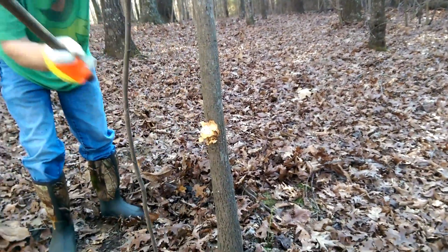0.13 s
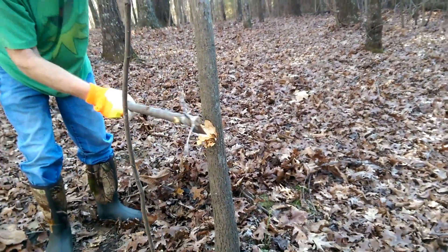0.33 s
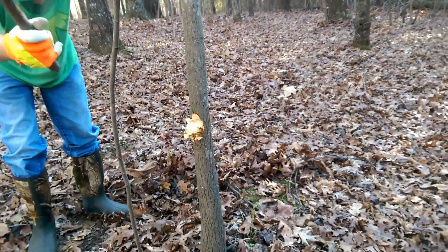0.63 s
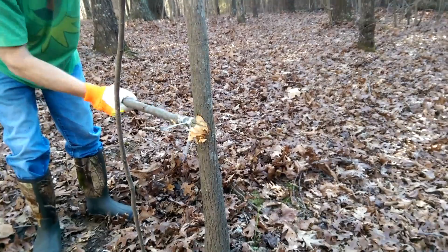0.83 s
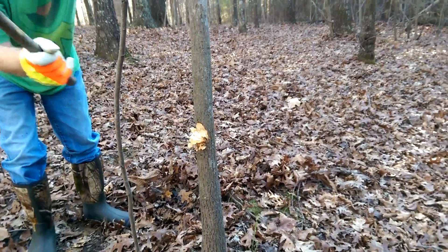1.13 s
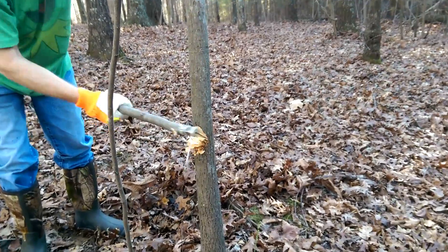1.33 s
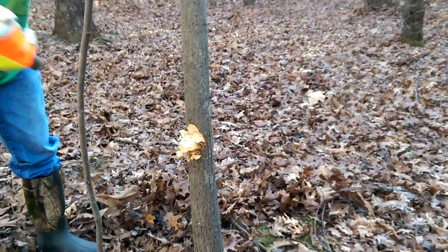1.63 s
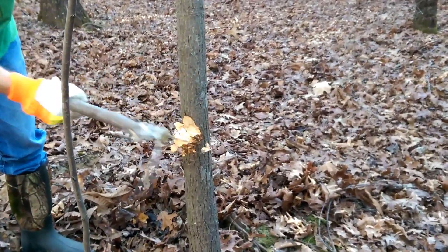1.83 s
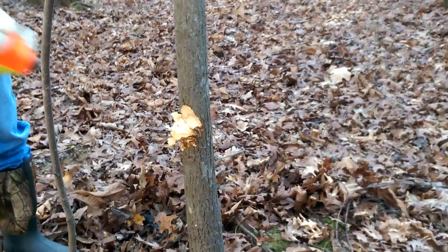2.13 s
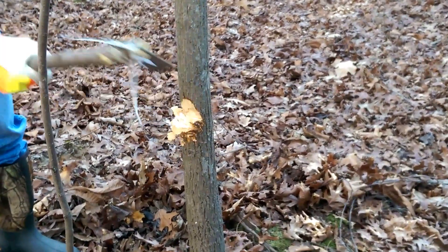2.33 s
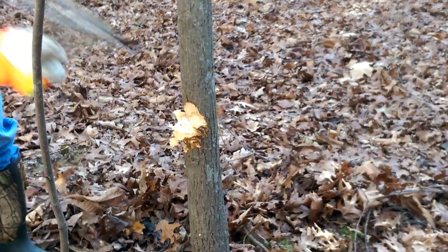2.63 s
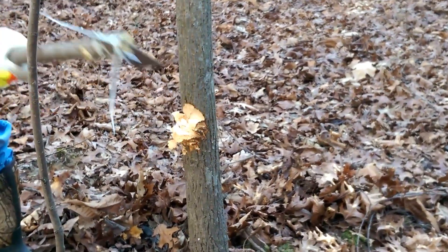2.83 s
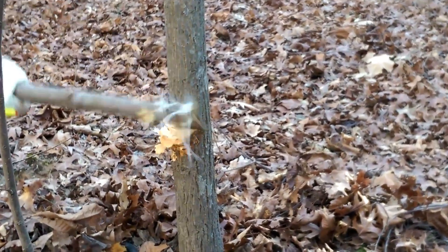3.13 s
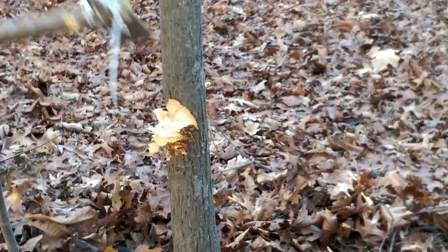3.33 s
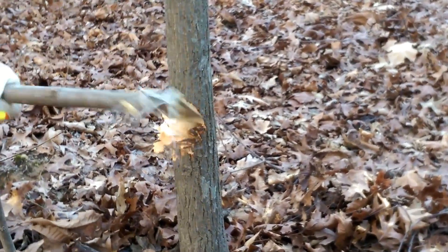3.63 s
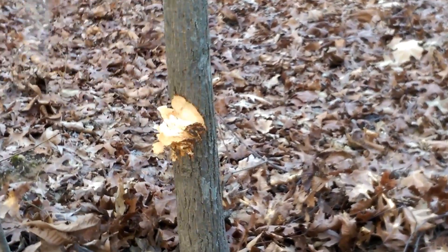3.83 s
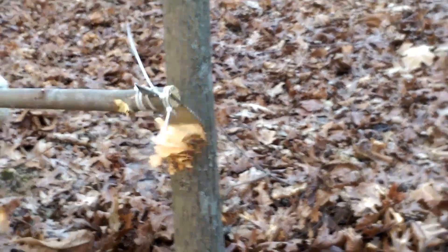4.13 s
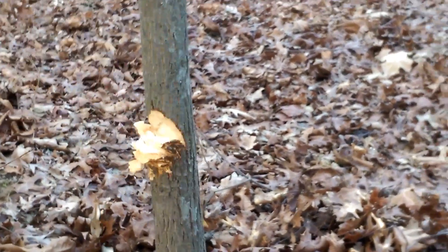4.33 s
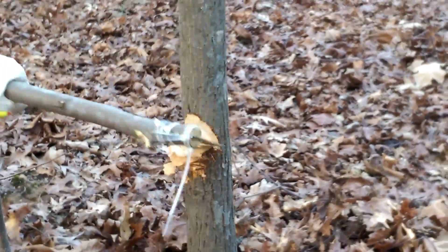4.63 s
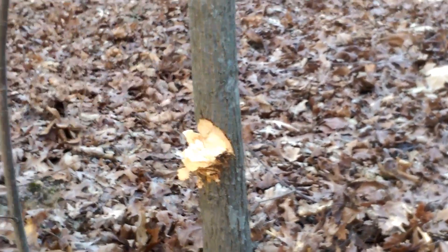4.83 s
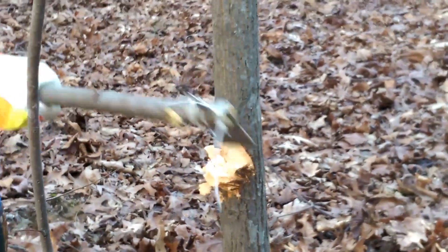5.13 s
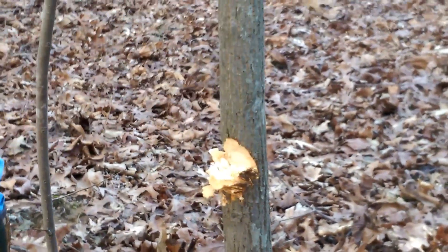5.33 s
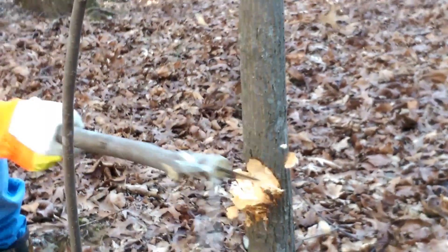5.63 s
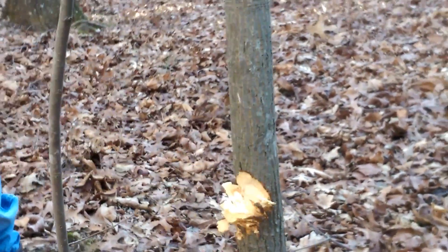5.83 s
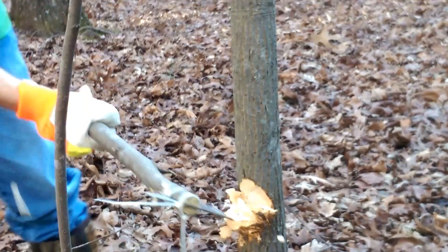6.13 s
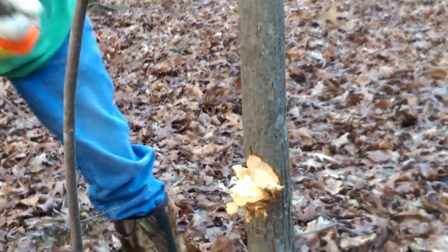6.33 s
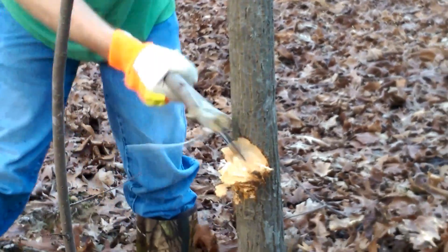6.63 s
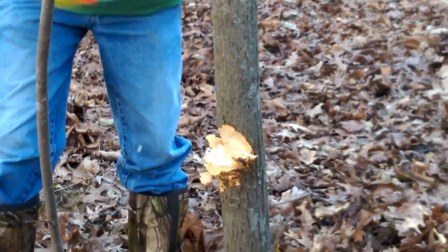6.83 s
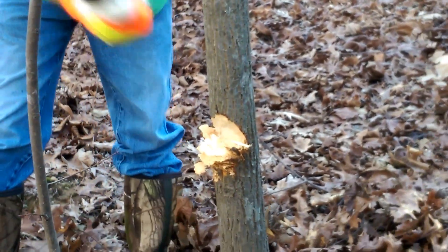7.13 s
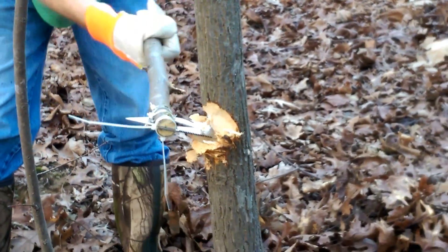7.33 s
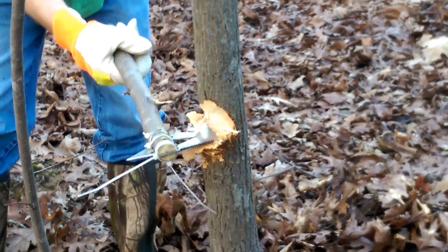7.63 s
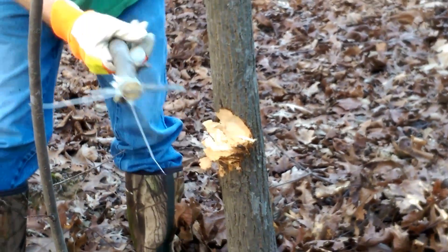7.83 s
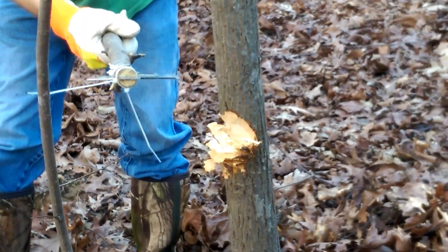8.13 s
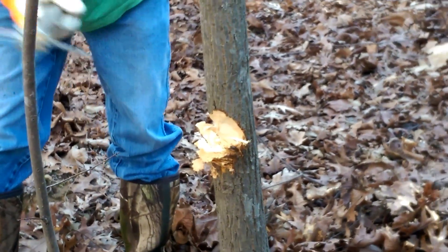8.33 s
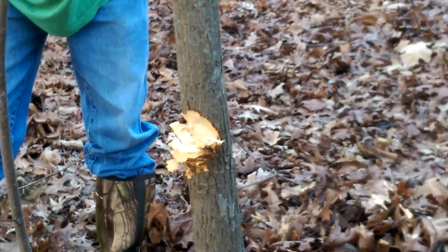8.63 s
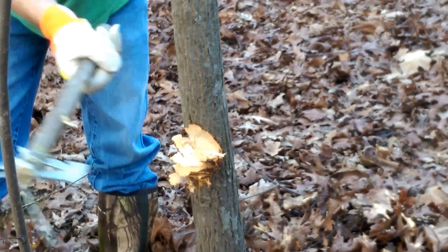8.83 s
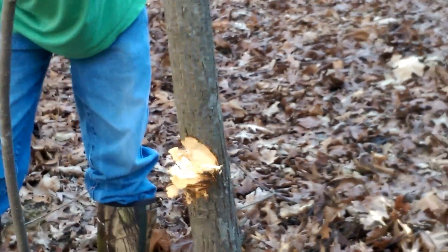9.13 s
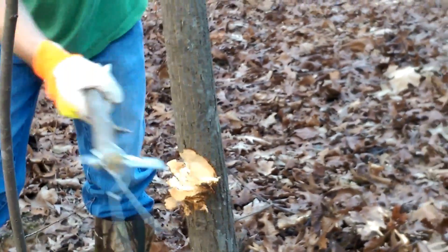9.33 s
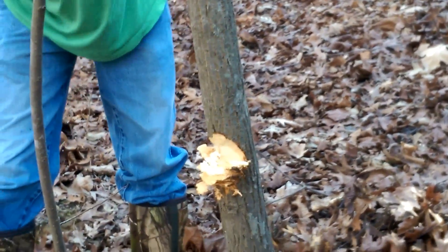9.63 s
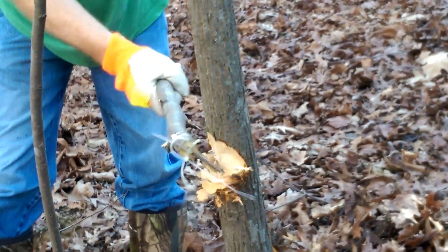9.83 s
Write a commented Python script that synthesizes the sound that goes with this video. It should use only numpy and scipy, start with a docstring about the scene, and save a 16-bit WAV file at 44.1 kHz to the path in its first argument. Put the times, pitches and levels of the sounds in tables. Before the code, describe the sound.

Close stereo pickup in quiet leafy woods: a small axe strikes a thin trunk about every half second, each blow a short bright crack with a woody knock and faint echo. Chips tick into dry leaves. After six seconds boots shuffle loudly through the litter, a few less regular blows follow, then a gap with a tap on the microphone case, and three last chops.

```python
"""A small axe bites again and again into a thin standing tree in leaf-covered woods.
Each blow is a burst of tearing-fibre clicks over ringing trunk and blade modes, with a tail among the trunks.
Debris showers and chips patter into dry leaves as enveloped grains; boots shuffle the litter.
The handle and boots knock as puffs of noise, one chip whirrs, the case is tapped, a low hum lies far below.
Two close microphone ports hear it: the right lags, nearly opposed in the bass and mostly softer."""
import sys
import numpy as np
from scipy import signal
from scipy.fft import irfft
from scipy.io import wavfile

SR = 44100
rng = np.random.default_rng(int(sys.argv[2]) if len(sys.argv) > 2 else 0)


def unload_audio(sound):
    """Save the sound as a 16-bit wav file, at the path given as the first command line argument."""
    columns = np.transpose(np.atleast_2d(sound))
    # keep every value between -1 and 1, then stretch to whole-number steps
    steps = np.round(np.clip(columns, -1, 1) * 32767)
    wavfile.write(sys.argv[1], SR, steps.astype(np.int16))


N = 440543

# axe blows: [t/s, level/dB, t60/s, second bite after/s, second bite re first/dB,
#             bass/dB, low-mid/dB, treble/dB, debris shower/dB]
BLOWS = [(0.3128, -5, 0.019, 0.0067, -5, 4.5, 1.5, 6.5, -44),
         (0.891, -9.5, 0.015, 0.0064, -12, 1, -2, 8, -51.5),
         (1.3642, -6.5, 0.025, 0.014, -33, 8.5, -3.5, 7, -51),
         (1.8319, -5.5, 0.0089, 0.0044, -5.5, 8, -0.5, 9, -49),
         (2.296, -6, 0.015, 0.0043, -22.5, 6.5, 0.5, 4.5, -42),
         (2.7496, -9.5, 0.012, 0.0035, -24, 10.5, 4.5, 12.5, -51.5),
         (3.2243, -11.5, 0.017, 0.002, -30, 3, 0, 12, -46),
         (3.7441, -6.5, 0.017, 0.0021, -8, 8, -1.5, 4.5, -47.5),
         (4.2146, -5, 0.021, 0.0034, -23.5, 10.5, 2, 7.5, -48),
         (4.669, -6, 0.019, 0.013, -43, 1.5, -3.5, 5, -45.5),
         (5.1447, -6, 0.027, 0.00081, -6.5, 5, -5.5, 6, -47.5),
         (5.616, -9, 0.018, 0.0035, -8, 7.5, -4, 10, -43),
         (6.119, -6, 0.015, 0.0037, -1, -1.5, -8, 3.5, -75),
         (6.7277, -9.5, 0.021, 0.0054, -0.5, 6, -5.5, 9.5, -71),
         (7.283, -14.5, 0.026, 0.0031, -5, 11.5, -1, 12.5, -54),
         (7.3448, -15.5, 0.023, 0.0014, -16, 3.5, -6.5, -2, -76),
         (8.8321, -7, 0.015, 0.0036, -22, 3, -9.5, 7.5, -44),
         (9.3537, -9.5, 0.027, 0.0049, -23, 5.5, -6, 11.5, -35),
         (9.912, -7.5, 0.032, 0.0088, -5, 6, -9, 8.5, -39)]
# centres of the bass, low-mid, core and treble regions: [f/Hz]
REGIONS_HZ = [450, 1250, 3300, 9500]
EDGES_HZ = 25 * 2 ** np.arange(0, 9.5, 1 / 3)   # third-octave band edges
BANDS_HZ = np.sqrt(EDGES_HZ[1:] * EDGES_HZ[:-1])


def from_db(db):
    """Decibels to amplitude."""
    return 10 ** (np.asarray(db) / 20)


def rms_one(x):
    """Scales a signal to an rms of 1."""
    return x / np.sqrt(np.mean(x ** 2) + 1e-20)


def in_time(rows):
    """Draws straight lines between the timed rows, one curve per column."""
    s, *columns = np.transpose(rows)
    return [np.interp(np.arange(N) / SR, s, c) for c in columns]


def at_hz(points, hz):
    """Reads a spectrum table at one frequency, along a logarithmic axis."""
    return np.interp(np.log(hz), np.log(np.array(points)[:, 0]), np.array(points)[:, 1])


def drift(rate):
    """Slow random curve of rms 1: noise at every 40th sample through a double one-pole low-pass."""
    r = np.exp(-80 * np.pi * rate / SR)
    noise = rng.standard_normal(N // 40 + 2002)
    slow = signal.lfilter([1], [1, -2 * r, r * r], noise)[2000:]   # skip the filter's run-in
    return np.interp(np.arange(N) / 40, np.arange(len(slow)), rms_one(slow))


def ring(clicks, hz, t60):
    """Resonator: a unit click sets a dying sine of height 1 ringing."""
    r, w = from_db(-60 / (t60 * SR)), 2 * np.pi * hz / SR
    return signal.lfilter([0, np.sin(w)], [1, -2 * r * np.cos(w), r * r], clicks + 1e-18)


def grains(per_s, spread_db):
    """Two unrelated trains of random clicks of uneven size and either sign; rms 1 together."""
    sizes = from_db(spread_db * np.minimum(rng.exponential(1, (2, N)), 4.0))
    signed = sizes * rng.choice([-1, 1], (2, N))
    return rms_one(signed * (rng.random((2, N)) < per_s / SR))


def add(track, s, level_db, t60, rise_s):
    """Lays a quickly rising, exponentially dying envelope on the track."""
    i = round(s * SR)
    length = max(min(round(1.5 * t60 * SR), track.shape[-1] - i), 0)
    t = np.arange(length) / SR
    shape = (1 - np.exp(-t / rise_s)) * from_db(-60 * t / t60)
    track[..., i:i + length] += from_db(level_db)[..., None] * shape


def blow_envelopes():
    """Envelopes of the four regions: the edge lands, then bites a second time as fibres give."""
    out = np.zeros((len(REGIONS_HZ), N))
    for s, db, t60, later, second_db, bass_db, mid_db, treble_db, _ in BLOWS:
        colour_db = db + np.array([bass_db, mid_db, 0, treble_db])
        add(out, s, colour_db, t60, rise_s=.00005)
        add(out, s + later, colour_db + second_db, t60, rise_s=0.00053)
        # splinters and the nearest reflections linger
        add(out, s, colour_db - 25.5, .12, rise_s=0.0044)
    return out


def trunk():
    """Both bites of a blow strike every mode; strength and pitch shift with where the edge lands in the cut."""
    # trunk and blade modes: [f/Hz, level/dB, t60/s]
    cut_modes = [(130, -37, 0.059), (226, -34.5, 0.032), (337, -26, 0.016), (1165, -12, 0.0054),
                 (2081, -19, 0.007), (3030, -5.5, .012)]
    out, t = np.zeros(N), np.arange(N) / SR
    for s, db, t60, later, second_db, bass_db, *colour in BLOWS:
        spots = rng.standard_normal((len(cut_modes), 2))
        for (hz, level_db, ring_s), (strength, place) in zip(cut_modes, spots):
            level_db += bass_db * (hz < 700)   # the blow's bass colours the low modes only
            i = round(s * SR)
            swell = np.zeros(min(SR // 8, N - i))
            add(swell, 0, db + level_db + 3.0 * strength, ring_s, rise_s=.0001)
            add(swell, later, db + second_db + level_db + 0.75 * strength, ring_s, rise_s=0.00046)
            pitch_hz = hz * (1 + 0.053 * place)
            out[i:i + len(swell)] += swell * np.sin(2 * np.pi * pitch_hz * t[:len(swell)])
    return out


def leaf_envelopes():
    """Each blow shakes down a shower of debris and chips land, on a bed of stirring litter."""
    # leaf litter stirring under the boots, one long shuffle after 6 s: [t/s, level/dB, treble/dB]
    rustle = [(0, -50, -4), (.75, -54, 1.5), (1.3, -58.5, 5.5), (1.75, -53, 0.5), (2.2, -58.5, 3.5),
              (3.6, -58, 3.5), (4.1, -59, 2.5), (4.19, -46.5, 5.5), (4.23, -59, 4.5), (5.0, -55.5, -4),
              (5.55, -61.5, 2.5), (5.95, -61.5, -5), (6.02, -41.5, -0.5), (6.28, -30.5, 0.5),
              (6.4, -33, 0.5), (6.5, -30, 1), (6.64, -42, -0.5), (6.84, -30, -.5), (7.11, -46.5, -1),
              (7.55, -57.5, -2), (8.5, -66.5, -7), (9.3, -60, -2.5), (9.99, -60, -4)]
    # chips and twigs landing in the leaves: [t/s, level/dB, t60/s, treble/dB]
    chips = [(0.111, -31.5, 0.027, 1.5), (0.3734, -39.5, 0.022, 24), (0.3836, -32, 0.065, 5),
             (0.451, -24, 0.13, 1.5), (0.5343, -42, 0.01, 16), (0.748, -41.5, 0.05, 5),
             (0.9436, -27, 0.014, 2), (1.085, -38.5, 0.014, 17.5), (1.433, -42.5, 0.014, 18),
             (1.5152, -33.5, 0.011, 20.5), (1.5257, -21.5, 0.036, 3), (1.544, -26, 0.0054, 19),
             (1.595, -22.5, 0.0065, 4.5), (1.7036, -34, 0.016, -7), (1.751, -30.5, 0.033, -1.5),
             (2.0195, -24.5, 0.015, 3.5), (2.0546, -35, 0.013, 6), (2.146, -27.5, 0.011, -13),
             (2.2512, -42.5, 0.011, 17), (2.348, -15, 0.0091, 4), (2.5746, -46.5, 0.089, 8),
             (2.7025, -20, 0.0063, 1), (2.837, -45, 0.0082, 18), (2.8948, -39, 0.0027, 33),
             (2.9374, -37, 0.025, 0), (3.275, -39, 0.012, 16), (3.3264, -38, 0.014, 20.5),
             (3.4842, -34.5, 0.014, 12.5), (3.5357, -30.5, 0.022, 0.5), (3.609, -21.5, 0.0053, 7.5),
             (3.6795, -32.5, 0.035, -1), (3.8915, -31.5, 0.011, 9.5), (3.9507, -41.5, 0.0066, 18.5),
             (4.2803, -40, 0.019, 18.5), (4.3273, -27, 0.0035, 16), (4.3454, -19.5, 0.0063, 16.5),
             (4.575, -31, 0.0096, 7), (4.645, -28, 0.022, -11), (4.7195, -12.5, 0.019, -21),
             (4.803, -36.5, 0.0095, 15), (5.1145, -21.5, 0.006, 3), (5.263, -33, 0.098, 4.5),
             (5.483, -23, 0.015, -5), (5.503, -35, 0.023, -1), (5.5432, -35, 0.019, 6.5),
             (5.7097, -35, 0.011, 10.5), (5.945, -25, 0.015, 1.5), (6.004, -35, 0.078, 11.5),
             (6.789, -24.5, 0.05, 3.5), (6.8067, -24, 0.025, 5), (7.17, -41, 0.07, 2),
             (7.497, -35.5, 0.017, 3.5), (7.7843, -34, 0.0095, 1), (9.3034, -36, 0.018, 4),
             (9.4405, -22, 0.012, 0), (9.462, -20.5, 0.063, -3.5), (9.664, -30, 0.031, -1.5),
             (9.755, -40, 0.021, 1)]
    shower_delay_s, shower_rise_s, shower_t60_s, shower_treble_db = .015, .025, 0.69, -1.5
    crumbs_per_s, crumb_t60_s, crumb_treble_db = 36, 0.0081, 7.5
    level_db, treble_db = in_time(rustle)
    top = np.array([0, 0, 0, 1])   # only the top region follows the treble values
    out = from_db(level_db + top[:, None] * treble_db)
    for s, *_, shower_db in BLOWS:
        shower_colour_db = shower_db + top * shower_treble_db
        add(out, s + shower_delay_s, shower_colour_db, shower_t60_s, rise_s=shower_rise_s)
    # litter and showers flicker in level, fast and slower
    out = out * from_db(1.37 * drift(50) + 0.59 * drift(12))
    # stray crumbs tick at random, a little above the quieter litter
    fallen = rng.random(N) < crumbs_per_s / SR
    crumb_db = np.minimum(level_db, -52) + 7.0 + 6.6 * np.minimum(rng.standard_normal(N), 1.3)
    ticks = signal.lfilter([1], [1, -from_db(-60 / (crumb_t60_s * SR))], fallen * from_db(crumb_db))
    out += ticks * from_db(top[:, None] * crumb_treble_db)
    for s, db, t60, chip_treble_db in chips:
        add(out, s, db + top * chip_treble_db, t60, rise_s=0.00078)
    return out


def whirr():
    """A chip spins off: a tone and a weaker one an octave below sink together and stop after 48 ms."""
    # the spinning chip: [t/s, level/dB, start f/Hz, fall/(octaves per s), t60/s]
    spin = (2.768, -40, 1620, 16, .16)
    s, db, hz, fall, t60 = spin
    swell, t = np.zeros(N), np.maximum(np.arange(N) / SR - s, 0)
    add(swell, s, db, t60, rise_s=.006)
    turns = hz * (1 - 2 ** (-fall * t)) / (fall * np.log(2))   # cycles of the gliding upper tone
    tones = np.sin(2 * np.pi * turns) + from_db(-7) * np.sin(np.pi * turns)
    return swell * tones * (t < .048)


def knocks():
    """Each knock, scuff or swell is a puff of noise, at most 0.5 s long, in a broad band around its own pitch."""
    # dull knocks and scuffs of handle and boots, and one faint swell near 2 kHz: [t/s, level/dB, f/Hz, t60/s]
    thuds = [(0.637, -33, 810, 0.017), (1.057, -47, 500, 0.03), (1.582, -41.5, 670, 0.038),
             (1.876, -28, 1310, 0.025), (4.098, -36, 610, 0.059), (4.14, -48.5, 868, 0.3),
             (6.3, -51, 430, 0.66), (7.521, -65, 2170, 3.3), (9.149, -41, 740, 0.034),
             (9.408, -38.5, 620, 0.028), (9.58, -54.5, 795, 1.6), (9.686, -41, 507, 0.028)]
    out, size = np.zeros(N + SR), SR // 2
    for (s, db, hz, t60), noise in zip(thuds, rng.standard_normal((len(thuds), size))):
        puff = np.zeros(size)
        add(puff, 0, db, t60, rise_s=0.00086)
        band = signal.butter(2, [hz / 1.53, hz * 1.27], "band", fs=SR, output="sos")
        i = round(s * SR)
        # the factor evens out the loudness of narrow and wide bands
        out[i:i + size] += signal.sosfilt(band, puff * noise) * np.sqrt(SR / hz)
    return out[:N]


def taps():
    """A tap dents the right port: a sharp spike that swings back slowly; the left gets it weaker and reversed."""
    # taps on the case beside the right port: [t/s, level/dB, right over left/dB]
    dents = [(7.8981, -12, 16), (8.0097, -29.5, 23)]
    clicks = np.zeros((2, N))
    for s, db, right_db in dents:
        clicks[:, round(s * SR)] = from_db(db - right_db), -from_db(db)
    spike = signal.lfilter([1], [1, -.75], clicks)
    swing = np.array([ring(side, 340, 0.0072) for side in clicks])
    return spike - 0.63 * swing


def noisy_sources():
    """Third-octave bank of tearing fibres, leaf grains, dying echoes and air, as a pair of unrelated twins."""
    # spectra of cracking wood, leaves, echoes and air: [f/Hz, level/dB]
    crack, litter = [(600, -15.5), (1100, 4.5), (1500, 2), (2200, 5), (3100, 3.5), (5000, 3), (7400, -25),
                     (9500, -0.5), (11500, -27), (14000, -17), (16000, -6.5)], [(200, -15), (700, -10.5), (1300, -6), (2000, -2.5), (4300, 4),
                                    (6000, -2), (7700, -10), (9800, 6.5), (12500, -14), (15000, -12),
                                    (16500, -16)]
    echo_colour, air = [(400, 0.5), (1500, 11), (3000, 8), (6000, 3.5), (10000, -9.5), (16000, -19.5)], [(30, -78), (65, -75.5), (130, -84.5), (300, -91), (700, -96),
                                        (2000, -101), (7500, -110), (9500, -106), (12000, -112),
                                        (16500, -116)]
    # echoes dying among the trunks: [f/Hz, t60/s]
    woods_t60 = [(200, 0.31), (1500, 0.57), (4000, 0.5), (12000, .4)]
    woods_db, fibres_per_s, leaf_grains_per_s = -39.5, 9000, 7000
    blows, leaves = blow_envelopes(), leaf_envelopes()
    fibres = grains(fibres_per_s, spread_db=2.5)
    leaf_grains = grains(leaf_grains_per_s, spread_db=3.0)
    white, strikes, out = rng.standard_normal((2, 2, N)), np.zeros(N), 0
    landing = np.array([round(row[0] * SR) for row in BLOWS])
    fibres[:, landing + 3] = 3.5   # the edge lands with one hard click
    strikes[landing] = from_db(np.array(BLOWS)[:, 1] + woods_db)
    for k, hz in enumerate(BANDS_HZ):
        region = np.argmin(abs(np.log(hz / np.array(REGIONS_HZ))))
        # echoes and air: smooth noise
        decay = from_db(-60 / (at_hz(woods_t60, hz) * SR))
        echo = from_db(at_hz(echo_colour, hz)) * signal.lfilter([1], [1, -decay], strikes)
        air_level = from_db(at_hz(air, hz) + 1.0 * drift(2.2)) * np.sqrt(SR / 2)
        smooth = (echo + air_level) * white[k % 2]
        # deeper down only the trunk's modes answer a blow
        cracks = hz > crack[0][0] / 2
        tearing = cracks * from_db(at_hz(crack, hz)) * blows[region] * fibres
        patter = from_db(at_hz(litter, hz)) * leaves[region] * leaf_grains
        # each band flickers, so every hit has its own colour
        grainy = (tearing + patter) * from_db(2.18 * drift(23.3))
        # alternate signs keep neighbouring bands in step where they cross
        drive = (-1) ** k * grainy + smooth
        band = signal.butter(2, EDGES_HZ[k:k + 2], "band", fs=SR, output="sos")
        out = out + signal.sosfilt(band, drive)
    return out


def hum():
    """A far, low tone whose pitch and level wander a little."""
    # far hum: [t/s, level/dB]
    swells = [(0, -59.5), (2, -55), (5.5, -58), (7, -53), (8, -51.5), (8.8, -57), (9.99, -52)]
    pitch_hz, wander_hz = 83.35, 0.6
    phase = 2 * np.pi * np.cumsum(pitch_hz + wander_hz * drift(2.16)) / SR
    level = from_db(in_time(swells)[0] + 1.3 * drift(8.2))
    return level * np.sqrt(2) * np.sin(phase)


def right_port(direct, twin):
    """Filtered, lagging copy of the left sound, mixed with an unrelated twin that dominates the treble."""
    # right port against left: [f/Hz, lag/rad, level/dB, likeness 0-1]
    ports = [(0, -2.5, 1.5, 0.6), (153.6, -2.5, -1, 0.96), (520, -2, -4, 1), (1000, -1.69, -4, 1),
             (1730, -2, -4.5, 0), (1980, 0.5, 2, 0.5), (2280, 1, -1.5, 0.14), (2820, 6, -4, 0.3),
             (4420, 8, -9, 0.26), (7360, 8.5, -1.5, 0), (7740, 10, -4, 0.1), (9900, 13, -7.5, 0.3),
             (11100, 15, -2.5, 0.32), (15800, 21, -1, 0.14)]
    hz, lag, level_db, alike = np.transpose(ports)
    grid = np.arange(513) * SR / 1024
    alike = np.clip(np.interp(grid, hz, alike), 0, 1)
    shadow = from_db(np.interp(grid, hz, level_db)) * np.exp(-1j * np.interp(grid, hz, lag))
    responses = irfft(shadow * [alike, np.sqrt(1 - alike ** 2)])
    # windowed tightly before the arrival, so that blows stay sharp
    window = np.r_[np.hanning(160)[:80], np.hanning(640)[320:]]
    paths = np.roll(responses, 80, axis=1)[:, :400] * window
    heard = signal.oaconvolve(np.array([direct, twin]), paths, axes=1).sum(axis=0)
    return heard[80:N + 80]   # takes back the 80 samples of the roll


def scene():
    """Sums the sources at the left port, derives the right port and taps the case."""
    left, twin = noisy_sources()
    left = left + trunk() + knocks() + whirr() + hum()
    return np.array([left, right_port(left, twin)]) + taps()


def record(dry):
    """Soft saturation rounds the peaks, then a steep low-pass cuts the top."""
    cutoff_hz = 16800
    low_pass = signal.cheby2(12, 70, cutoff_hz, fs=SR, output="sos")
    return signal.sosfilt(low_pass, .97 * np.tanh(dry / .97))


dry = scene()
out = record(dry)
unload_audio(out)
```